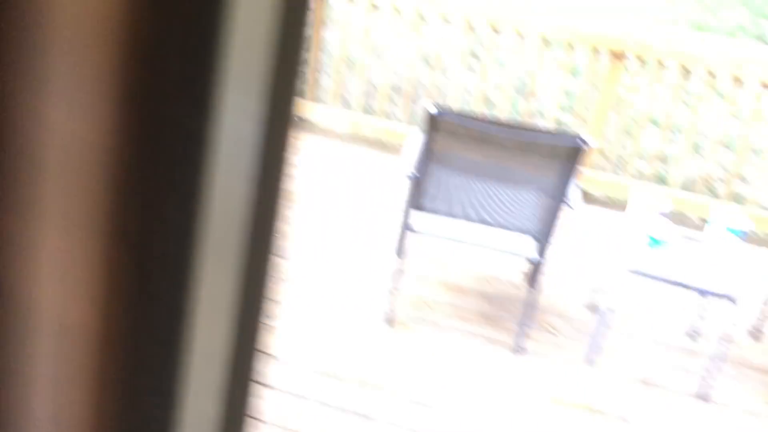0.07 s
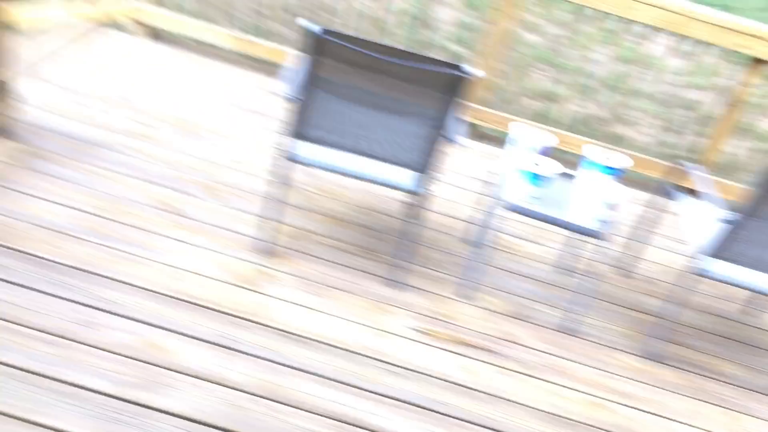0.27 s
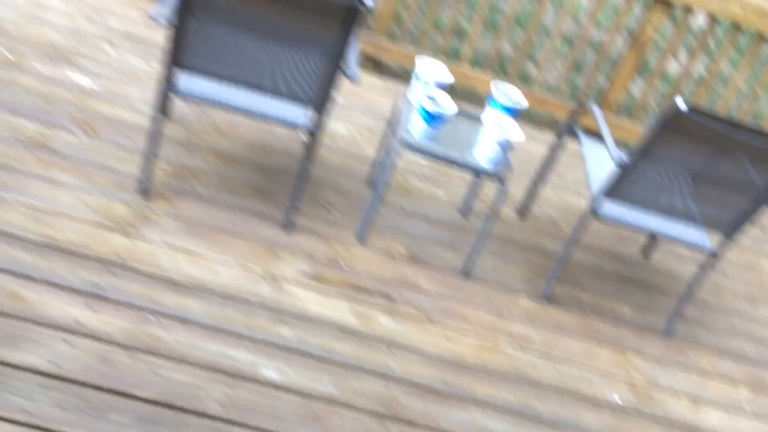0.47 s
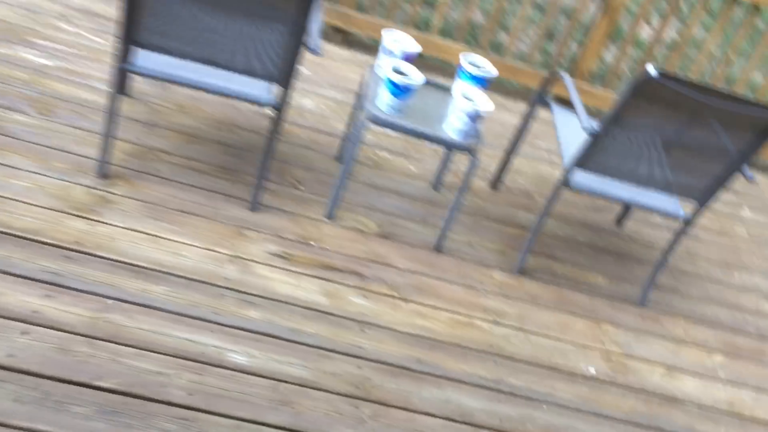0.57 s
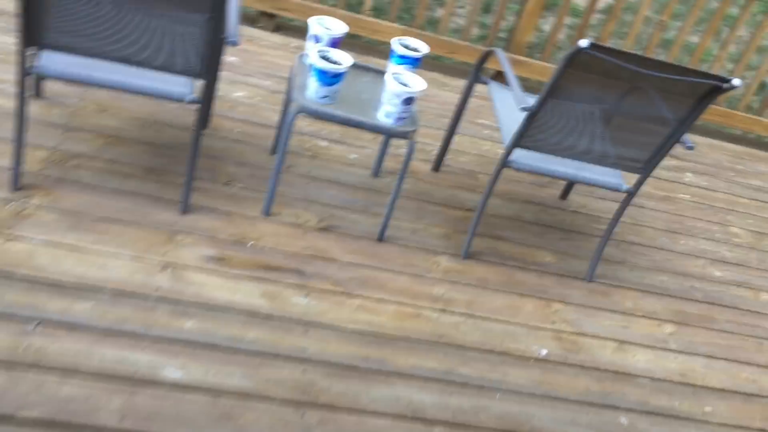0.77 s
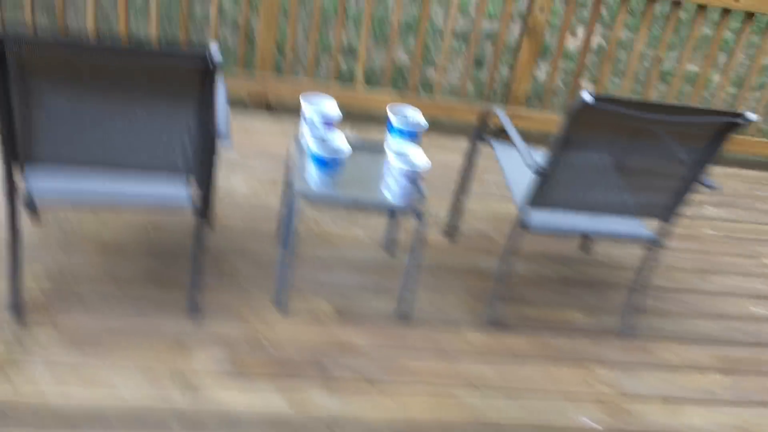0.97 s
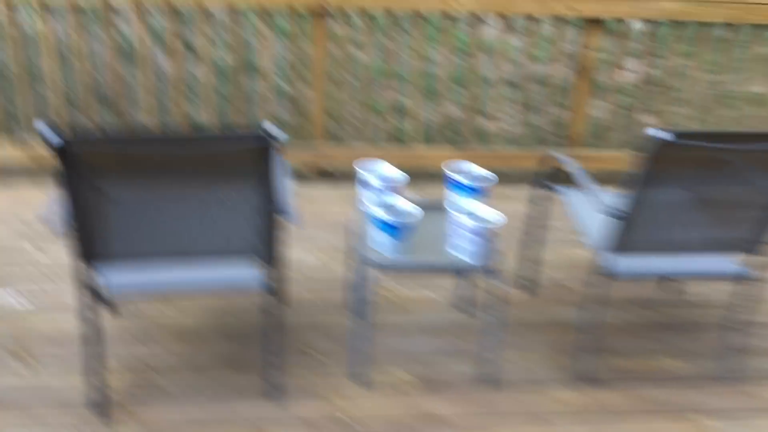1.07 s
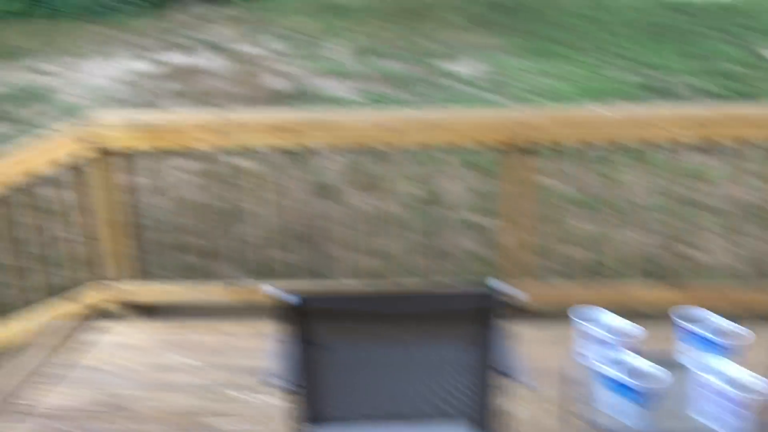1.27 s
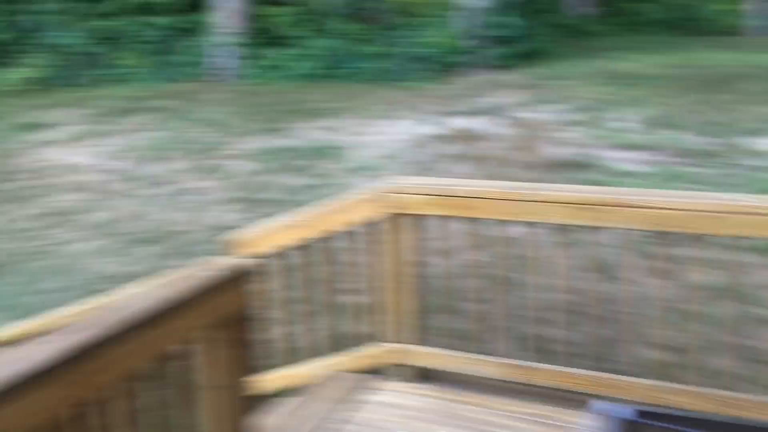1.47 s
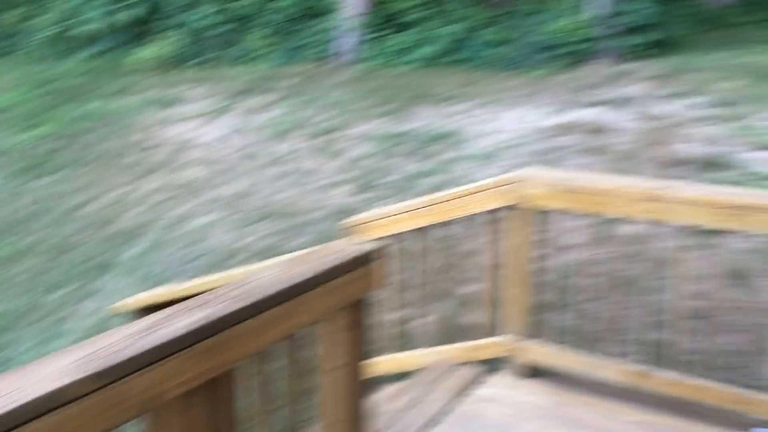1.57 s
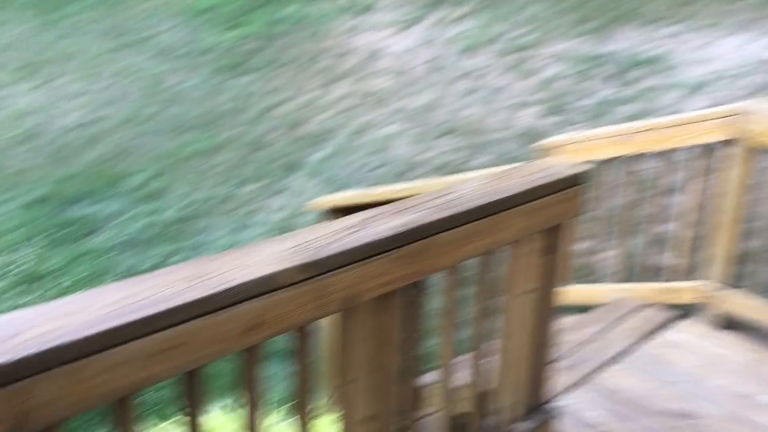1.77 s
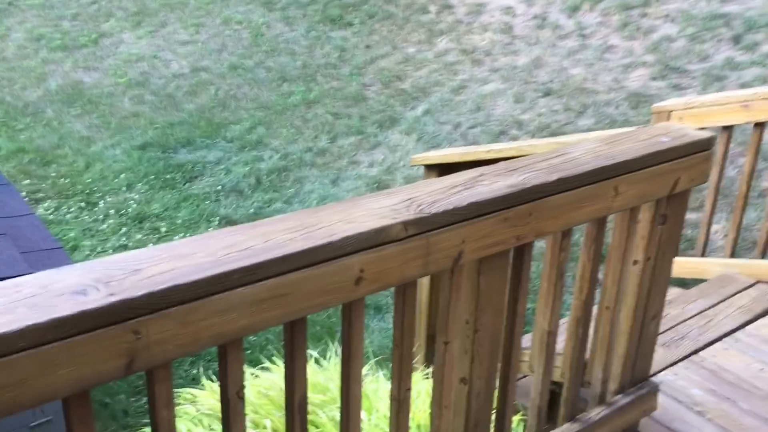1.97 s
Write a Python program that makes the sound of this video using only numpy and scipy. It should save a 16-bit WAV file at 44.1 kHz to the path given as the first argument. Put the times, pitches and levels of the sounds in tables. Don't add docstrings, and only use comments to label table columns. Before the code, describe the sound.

A sliding glass door rumbles over a gritty track with brushy hiss and thin squeaks, slows and stops; then low footsteps thud on a wooden deck with faint birds, heard close on a handheld phone.

```python
import sys
import numpy as np
from scipy import signal
from scipy.fft import rfft, irfft, next_fast_len
from scipy.io import wavfile
from scipy.ndimage import uniform_filter1d, map_coordinates

SR = 44100
rng = np.random.default_rng(int(sys.argv[2]) if len(sys.argv) > 2 else 0)


def put_to_file(sound):
    columns = np.atleast_2d(sound).T
    safe = np.clip(columns, -1, 1)
    whole_steps = np.round(safe * 32767)
    wavfile.write(sys.argv[1], SR, whole_steps.astype(np.int16))


def magnitude_from_level(level_db):
    exponent = np.asarray(level_db, float) / 20
    return 10 ** exponent


N = 88861

# time in seconds, wheel load in dB, seal pressure in dB.
DOOR_RUN = [
    (0, -27, -47.5),
    (.25, -29.5, -38.5),
    (.33, -32, -34.5),
    (.44, -33, -40.5),
    (.52, -39, -42.5),
    (.6, -45, -41.5),
    (.68, -56.5, -42),
    (.81, -62.5, -51.5),
    (.85, -95, -66),
]
# frequency in Hz, level in dB per Hz.
TRACK_SPECTRUM = [(240, -24), (400, -1), (680, -5), (788, -0.5), (1050, -2.5), (1420, 0.5), (2460, -16),
                  (3200, -39), (4160, -61), (7040, -120)]
# frequency in Hz, level in dB per Hz.
PANE_SPECTRUM = [(20, -37), (45, -3.5), (100, -2.5), (176, -1.5), (229, 0), (272, -9.5), (313, 1.5),
                 (497, -20), (900, -29)]
# start in seconds, peak in dB, ring in Hz.
GRIT_KNOCKS = [(0.03, -21, 1440), (0.076, -8.5, 1427), (0.084, -17, 1075), (0.115, -11, 1140),
               (0.172, -7, 1414), (0.239, -23, 1390), (0.26, -15, 1160), (0.29, -11, 1300),
               (0.303, -10.5, 797), (0.335, -17.5, 1410), (0.393, -34, 1090), (0.424, -13, 1660),
               (0.448, -27, 945), (0.474, -18, 1120), (0.54, -16, 1560), (.541, -20.5, 766),
               (0.571, -26, 1090), (0.651, -37, 760), (0.71, -28.5, 1610)]
# start in seconds, level in dB, pitch in Hz.
PANE_THUDS = [(.015, -23, 85), (.042, -23.5, 191), (.072, -21.5, 89), (0.101, -28.5, 222),
              (0.123, -23.5, 179), (.222, -21.5, 325), (0.292, -27, 202), (0.294, -23.5, 82.5),
              (.335, -25, 310), (.378, -23, 320), (.428, -27.5, 201), (.474, -28, 86)]
# frequency in Hz, level in dB per Hz.
SEAL_SPECTRUM = [(1500, -10.5), (2500, -6.5), (3500, 1), (6200, 2.5), (9200, 1.5), (12500, -0.5),
                 (15500, -0.5)]
# frequency in Hz, width in Hz, depth from 0 to 1.
HISS_NOTCHES = [(4770, 1150, 0.69), (7380, 960, 0.62), (10160, 270, 0.3)]
# start in seconds, length in seconds, frequency in Hz, width in Hz,
# level in dB.
BRISTLE_SCUFFS = [(0, 0.026, 6100, 900, -41.5), (.047, 0.005, 5000, 3020, -33),
                  (0.102, .03, 9100, 1200, -40.5), (0.173, 0.0076, 4200, 1200, -34.5),
                  (0.186, 0.024, 5460, 716, -37), (.217, 0.009, 10000, 900, -47),
                  (0.228, .01, 11300, 900, -33.5), (0.242, 0.052, 3800, 2500, -37),
                  (.25, 0.032, 6200, 800, -37), (0.322, 0.013, 6640, 1000, -31.5),
                  (0.329, 0.0083, 5000, 1200, -36.5), (0.375, 0.055, 6800, 800, -42.5),
                  (0.4202, 0.0043, 2450, 2200, -28), (0.438, 0.024, 9500, 1200, -33.5),
                  (0.449, 0.002, 4500, 5000, -31), (0.524, 0.019, 9600, 900, -37),
                  (0.561, .01, 7800, 500, -42.5), (0.618, 0.064, 6130, 880, -53),
                  (0.619, 0.0032, 3900, 900, -44), (0.688, 0.14, 3000, 1090, -44.5),
                  (0.718, 0.05, 3000, 600, -45), (0.763, 0.078, 2080, 700, -52.5),
                  (.17, 0.0028, 2120, 1190, -33), (0.238, 0.0097, 2180, 1200, -31),
                  (0.337, 0.0053, 2150, 1210, -29.5)]
# time in seconds, level in dB, pitch in Hz.
FIBRE_SQUEAL = [(0, -70, 14800), (.175, -40, 15300), (.23, -40, 13160), (.31, -30.5, 15160),
                (.37, -28.5, 14160), (.398, -27, 13900), (.432, -30.5, 13130), (.485, -26.5, 13340),
                (.515, -31.5, 12600), (.54, -45, 12600), (.64, -40.5, 13800), (.78, -54, 13800),
                (.83, -87, 13000)]
# start in seconds, length in seconds, from Hz, to Hz, level in dB.
RUBBER_SQUEAKS = [
    (.524, 0.009, 4660, 4580, -49),
    (.538, 0.014, 4710, 3580, -41.5),
    (.548, .013, 3720, 3506, -34.5),
    (.558, .006, 3700, 4130, -39),
    (.561, 0.022, 4175, 3556, -40.5),
    (.581, .011, 3600, 3280, -39),
    (.678, 0.006, 3530, 3150, -43),
    (.697, 0.021, 2190, 2070, -45),
]
# start in seconds, length in seconds, from Hz, to Hz, level in dB.
SEAL_DRAG = [
    (.716, 0.1, 2280, 2150, -52),
    (.73, 0.016, 3550, 3420, -51),
    (.742, 0.026, 3220, 3060, -47),
]
# frequency in Hz, level in dB per Hz.
AIR_SPECTRUM = [(18, -40), (30, 7), (90, 3), (215, -6), (540, -21.5), (1760, -18), (4780, -27.5),
                (6050, -30), (16000, -28.5)]
# frequency in Hz, level in dB.
MACHINE_TONES = [(1515, -71), (1750, -71)]
# frequency in Hz, width in Hz, level in dB.
PANE_MODES = [(177.9, 7.1, -35.5), (62, 41, -34), (292, 110, -50.5)]
# start in seconds, level in dB, frequency in Hz, width in Hz, T60 in seconds.
DECK_TICKS = [(1.101, -42, 1180, 600, 0.05), (1.102, -49.5, 2060, 1000, 0.091),
              (1.138, -42.5, 800, 2360, 0.086), (1.233, -45.5, 1190, 1470, 0.057),
              (1.2957, -39.5, 8750, 9000, 0.0079), (1.303, -44, 9400, 4000, 0.0083),
              (1.3194, -44, 2400, 1510, 0.016), (1.58, -42.5, 2450, 600, 0.031),
              (1.045, -53.5, 5000, 6000, 0.026)]
# start in seconds, level in dB, boom in Hz, length in seconds until the
# boom falls away, board knock in dB.
FOOTSTEPS = [(1.107, -16.5, 70.8, 0.073, -32), (1.13, -39, 69.6, 0.063, -36.5),
             (1.192, -23, 62.8, 0.046, -53), (1.271, -37, 62, 0.066, -49.5), (1.45, -40.5, 62, 0.049, -46),
             (1.537, -37.5, 60.4, 0.11, -68), (1.63, -38.5, 57.1, 0.22, -61),
             (1.795, -28.5, 67.3, 0.05, -33), (1.841, -32, 65.7, 0.092, -43), (1.936, -33, 56, 0.075, -65),
             (2.004, -40, 59.6, 0.046, -49)]
# frequency in Hz, width in Hz, level in dB.
BOARD_MODES = [(136, 27, 3.5), (204, 34, 2), (320, 83, -1.5), (450, 270, -9.5)]
# start in seconds, length in seconds, from Hz, to Hz, level in dB.
BIRD_CALLS = [(1.2, 0.054, 6850, 6500, -67.5), (1.235, 0.029, 6390, 5860, -55.5),
              (1.228, 0.039, 3700, 3100, -63.5), (1.365, 0.04, 4100, 4800, -65),
              (1.395, 0.03, 4720, 4160, -61.5), (1.396, 0.026, 8500, 7640, -62.5),
              (1.41, .03, 6300, 5700, -66), (1.535, 0.026, 4720, 5120, -61.5), (1.54, .03, 5010, 4540, -61),
              (1.565, 0.03, 4460, 3870, -64), (1.55, 0.057, 9100, 7800, -70.5),
              (1.94, 0.041, 1920, 1683, -68), (1.985, 0.031, 3620, 3530, -67),
              (1.99, 0.019, 4690, 4280, -68)]
# start in seconds, length in seconds, from Hz, to Hz, level in dB.
BIRD_PIPS = [
    (1.62, .012, 2130, 2120, -62),
    (1.633, 0.023, 2310, 2250, -50),
    (1.67, 0.019, 2300, 2280, -57),
]
# start in seconds, length in seconds, from Hz, to Hz, level in dB.
BIRD_SONG = [
    (1.668, 0.026, 3550, 3400, -66),
    (1.688, 0.014, 3450, 2600, -51.5),
    (1.7, 0.012, 2760, 2400, -56),
    (1.712, 0.023, 2420, 2297, -46),
    (1.732, 0.062, 2400, 2000, -50.5),
    (1.785, 0.095, 2043, 1983, -54),
]

GRIT_RATE_HZ, TRACK_GRIT_SHARE, PANE_GRIT_SHARE = 890, 0.48, 0.26
PANE_DB, PANE_FOLLOWS, PANE_LAG_S = -0.1, 0.51, 0.16
KNOCK_T60_S, KNOCK_CRACK_DB = 0.02, 0
THUD_RISE_S, THUD_T60_S = 0.0086, 0.15
SEAL_DB = 6
SLIPS, SLIP_PITCH_SCATTER, SLIP_LIFE_S = 4000, 0.055, 0.0022
SLIP_SCATTER_DB, SLIP_SWELL_DB = 3.2, 1.4
AIR_DB = -50
RING_FROM_S, RING_T60_S = 0.54, 0.88
BOOM_RISE_S, SAG, SAG_S = 0.0068, 0.4, 0.011
TREES_T60_S, TREES_DB, SONG_T60_S, SONG_ECHO_DB = 0.44, 1.5, 0.33, -3


def unit(x):
    return x / np.sqrt(np.mean(x ** 2) + 1e-20)


def curves(rows):
    s, *cols = np.transpose(rows)
    return [np.interp(np.arange(N) / SR, s, c) for c in cols]


def wobble(rate_hz):
    knots = rng.standard_normal(int(N * rate_hz / SR) + 4)
    return map_coordinates(knots, [np.arange(N) * rate_hz / SR])


def filtered(x, response):
    m = next_fast_len(N + SR // 2)
    return irfft(rfft(x, m) * response(np.fft.rfftfreq(m, 1 / SR)), m)[:N]


def coloured(x, points):
    f, db = np.transpose(points)
    return unit(filtered(x, lambda hz: magnitude_from_level(np.interp(np.log(hz + 1), np.log(f + 1), db))))


def resonance(hz, width_hz):
    return lambda f: 1j * f * width_hz / (hz * hz - f * f + 1j * f * width_hz)


def resonant_noise(hz, width_hz, order):
    return unit(filtered(rng.standard_normal(N), lambda f: resonance(hz, width_hz)(f) ** order))


def patchy(patchy_db):
    z = signal.stft(rng.standard_normal(N), nperseg=256)[2]
    field = uniform_filter1d(uniform_filter1d(rng.standard_normal(z.shape), 4, 0), 8, 1)
    return signal.istft(z * magnitude_from_level(patchy_db * unit(field)), nperseg=256)[1][:N]


def add(track, s, x):
    part = track[round(s * SR):][:len(x)]
    part += x[:len(part)]


def glides(rows, warble, hoarse, hoarse_hz):
    out = np.zeros(N)
    drift = 1 + warble * wobble(150)
    flutter = 1 + hoarse * wobble(hoarse_hz)
    for s, length_s, hz0, hz1, db in rows:
        u = np.linspace(0, 1, round(length_s * SR))
        hz = hz1 + (hz0 - hz1) * (1 - u) ** 1.655
        hz = hz * np.resize(drift[round(s * SR):], len(u))
        swell = np.abs(np.sin(np.pi * u)) ** 0.29
        add(out, s, magnitude_from_level(db + 4) * swell * np.sin(2 * np.pi * np.cumsum(hz) / SR))
    return out * unit(flutter)


def echoes(x, t60_s):
    t = np.arange(round(t60_s * SR)) / SR
    tail = rng.standard_normal(len(t)) * magnitude_from_level(-60 * t / t60_s) * (1 - np.exp(-t / 0.015))
    return signal.fftconvolve(x, tail / np.linalg.norm(tail))[:N]


def rolling():
    return np.arange(N) < DOOR_RUN[-1][0] * SR


def wheels():
    load_db = curves(DOOR_RUN)[0]
    grains = (rng.random(N) < GRIT_RATE_HZ / SR) * rng.standard_normal(N)
    grit = unit(grains * magnitude_from_level(6.2 * wobble(40.26)))

    def shake(share):
        return share * grit + np.sqrt(1 - share ** 2) * unit(patchy(1.0))

    track = magnitude_from_level(load_db + 1.5 * wobble(32.6)) * coloured(shake(TRACK_GRIT_SHARE), TRACK_SPECTRUM)
    slow_db = uniform_filter1d(load_db, round(PANE_LAG_S * SR)) - load_db[0]
    pane_db = load_db[0] + PANE_DB + PANE_FOLLOWS * slow_db + 0.59 * wobble(25.6)
    fade = np.clip((1.05 - np.arange(N) / SR) / 0.58, 0, 1)
    pane = magnitude_from_level(pane_db) * fade * coloured(shake(PANE_GRIT_SHARE), PANE_SPECTRUM)
    return track * rolling() + pane


def knocks_and_thuds():
    out, t = np.zeros(N), np.arange(SR // 20) / SR
    for s, db, hz in GRIT_KNOCKS:
        ring = np.sin(2 * np.pi * hz * t) * (1 - np.exp(-(t / 0.0017) ** 2))
        crack = (1 - np.exp(-t / 0.0013)) * uniform_filter1d(rng.standard_normal(len(t)), size=12)
        decay = magnitude_from_level(db - 0.5 - 60 * t / KNOCK_T60_S)
        add(out, s - 0.002, decay * (ring + magnitude_from_level(KNOCK_CRACK_DB) * crack))
    for s, db, hz in PANE_THUDS:
        rise = 1 - np.exp(-(t / THUD_RISE_S) ** 2)
        decay = magnitude_from_level(db + 5.5 - 60 * t / THUD_T60_S) * np.cos(np.pi * t / t[-1] / 2)
        add(out, s, decay * rise * np.sin(2 * np.pi * hz * t))
    return out


def seal_hiss():
    level = magnitude_from_level(curves(DOOR_RUN)[1] + SEAL_DB + 0.62 * wobble(37.6))
    brush = coloured(patchy(2.5) * magnitude_from_level(1.64 * wobble(220)), SEAL_SPECTRUM)

    def notches(f):
        return np.prod([1 - depth * np.exp(-((f - hz) / width_hz) ** 2)
                        for hz, width_hz, depth in HISS_NOTCHES], axis=0)

    hiss = filtered(level * brush * rolling(), notches)
    for s, length_s, hz, width_hz, db in BRISTLE_SCUFFS:
        fibres = resonant_noise(hz, width_hz, 2)[:round(length_s * SR)]
        add(hiss, s, magnitude_from_level(db) * np.sqrt(np.hanning(len(fibres))) * fibres)
    return hiss


def seal_squeal():
    level_db, centre_hz = curves(FIBRE_SQUEAL)
    draw = rng.standard_normal((SLIPS, 2))
    at = (rng.random(SLIPS) * (SR - 2000)).astype(int)
    k = np.arange(300)
    hz = centre_hz[at] * np.exp(SLIP_PITCH_SCATTER * draw[:, 0])
    slip_db = SLIP_SCATTER_DB * draw[:, 1:] + SLIP_SWELL_DB * wobble(47.1)[at, None]
    pulse = np.exp(-((k - len(k) / 2) / SR / SLIP_LIFE_S) ** 2 * 4)
    slips = magnitude_from_level(slip_db) * pulse * np.sin(2 * np.pi * hz[:, None] * k / SR)
    whistle = np.bincount((at[:, None] + k).ravel(), slips.ravel(), N)[:N]
    return magnitude_from_level(level_db) * whistle / np.std(whistle[:SR])


def rubber():
    squeaks = glides(RUBBER_SQUEAKS, 0.012, 0.4, hoarse_hz=800) + glides(SEAL_DRAG, 0.008, 0.6, hoarse_hz=500)
    return squeaks + magnitude_from_level(-7) * echoes(squeaks, 0.021)


def outdoors():
    t = np.arange(N) / SR
    out = magnitude_from_level(AIR_DB) * coloured(patchy(0.5), AIR_SPECTRUM)
    for hz, db in MACHINE_TONES:
        level = magnitude_from_level(db + 4 + 2.4 * wobble(8.95))
        out = out + level * np.sin(2 * np.pi * hz * t + 0.57 * wobble(12))
    return out


def pane_ring():
    t = np.arange(N) / SR - RING_FROM_S
    swell = magnitude_from_level(np.where(t < 0, 200 * t, -60 * t / RING_T60_S))
    return swell * sum(magnitude_from_level(db) * resonant_noise(hz, width_hz, 2) for hz, width_hz, db in PANE_MODES)


def deck_ticks():
    out, t = np.zeros(N), np.arange(2000) / SR
    for s, db, hz, width_hz, t60_s in DECK_TICKS:
        burst = resonant_noise(hz, width_hz, 3)[:2000]
        add(out, s, magnitude_from_level(db + 0.5 - 60 * t / t60_s) * (1 - np.exp(-t / 0.00084)) * burst)
    return out


def footsteps():
    out, push, t = np.zeros(N), np.zeros(N), np.arange(SR) / SR
    sagging = t + SAG * SAG_S * (1 - np.exp(-t / SAG_S))
    short = t[:4000]
    for s, db, hz, length_s, knock_db in FOOTSTEPS:
        envelope = np.exp(-(t / length_s) ** 3) * (1 - np.exp(-(t / BOOM_RISE_S) ** 2))
        add(out, s, -magnitude_from_level(db) * envelope * np.sin(2 * np.pi * hz * sagging))
        knock = magnitude_from_level(knock_db - 60 * short / 0.18) * (1 - np.exp(-short / 0.0023))
        add(push, s, knock * rng.standard_normal(4000))

    def boards(f):
        return sum((-1) ** k * magnitude_from_level(db) * resonance(hz, width_hz)(f)
                   for k, (hz, width_hz, db) in enumerate(BOARD_MODES))

    return out + magnitude_from_level(16.5) * filtered(push, boards)


def birds():
    calls = glides(BIRD_CALLS, 0.012, 1.1, hoarse_hz=900)
    song = glides(BIRD_SONG, 0.004, 0.3, hoarse_hz=900)
    pips = glides(BIRD_PIPS, 0.003, 0.11, hoarse_hz=100)
    smear = magnitude_from_level(TREES_DB) * echoes(calls, TREES_T60_S) + magnitude_from_level(SONG_ECHO_DB) * echoes(song, SONG_T60_S)
    return pips + calls + song + smear


def scene():
    door = wheels() + knocks_and_thuds() + seal_hiss() + seal_squeal() + rubber() + pane_ring()
    deck = deck_ticks() + footsteps()
    return (door + deck + birds() + outdoors())[None]


def band_limit(x):
    return signal.sosfilt(signal.butter(12, 16440, fs=SR, output="sos"), x)


def record(dry):
    mix = filtered(dry[0], lambda hz: hz < 15750)[None]
    return band_limit(mix)


dry = scene()
out = record(dry)
put_to_file(out)
```